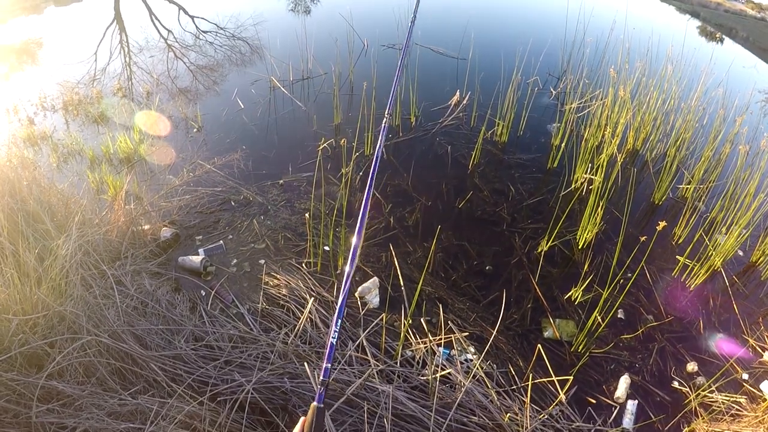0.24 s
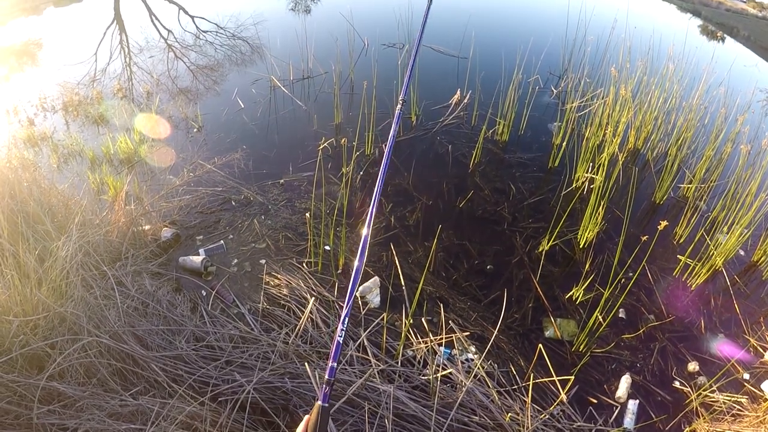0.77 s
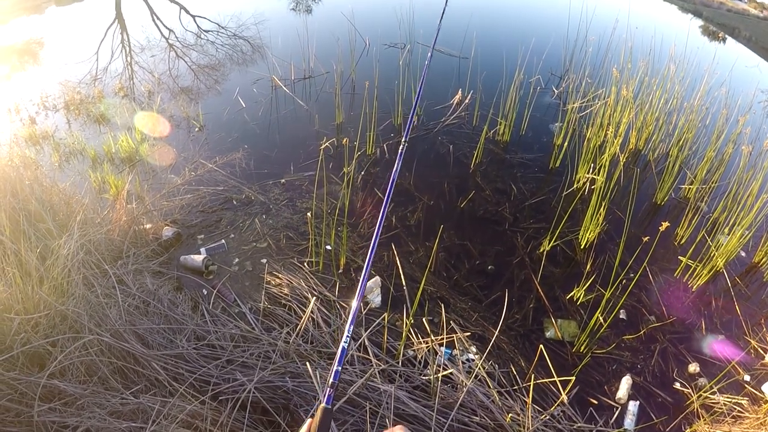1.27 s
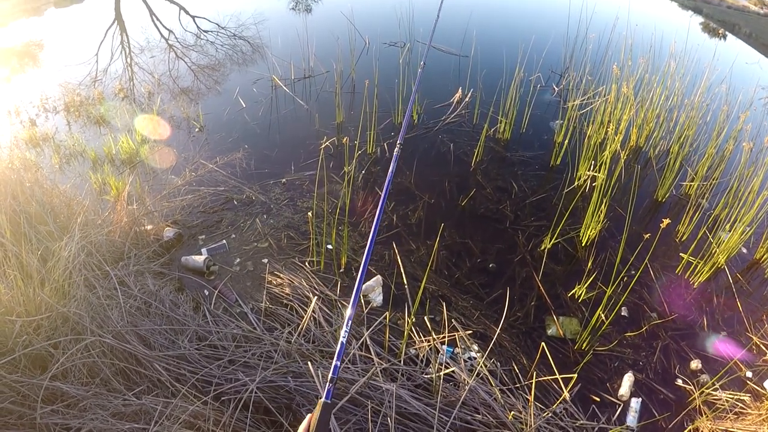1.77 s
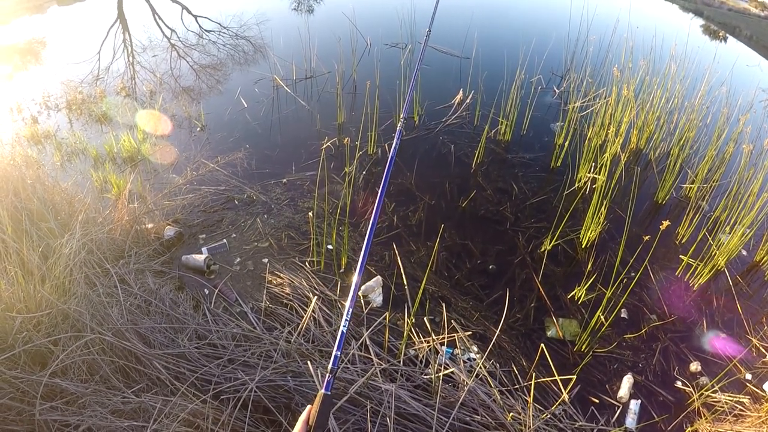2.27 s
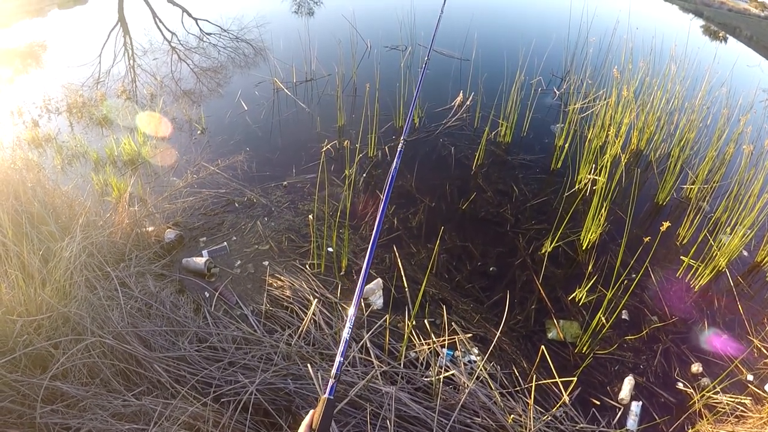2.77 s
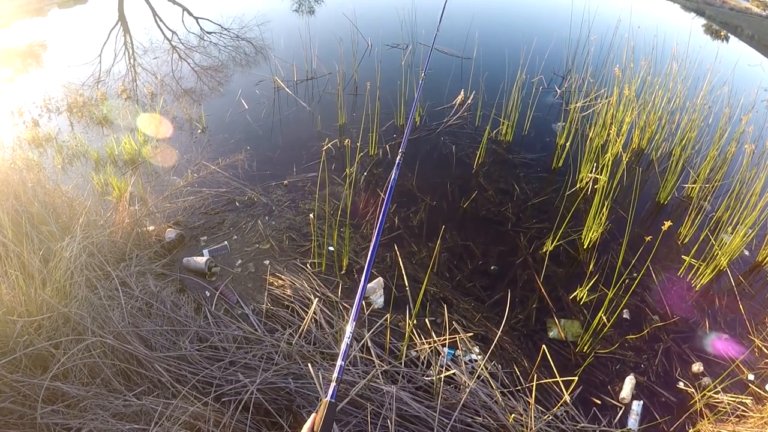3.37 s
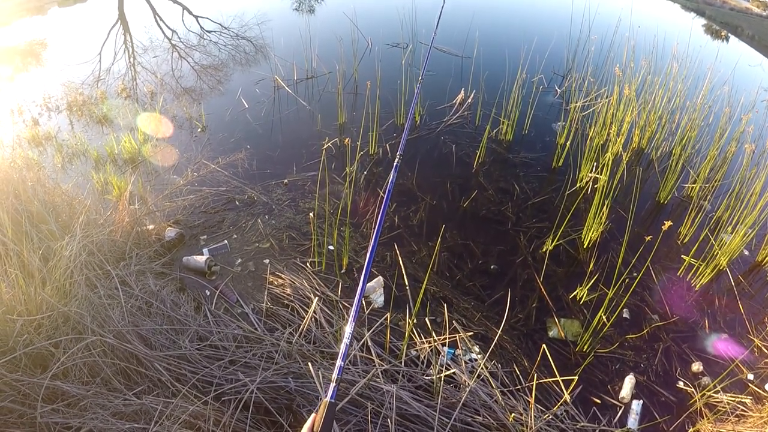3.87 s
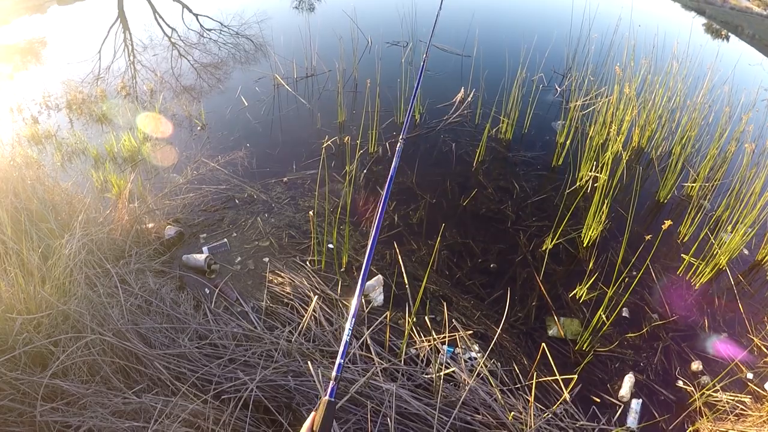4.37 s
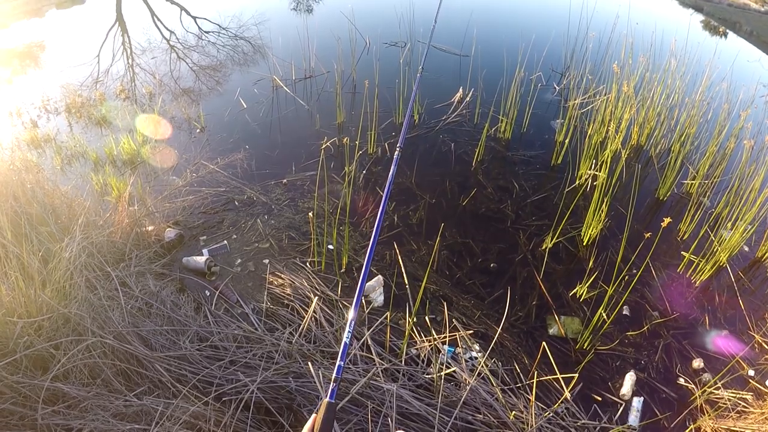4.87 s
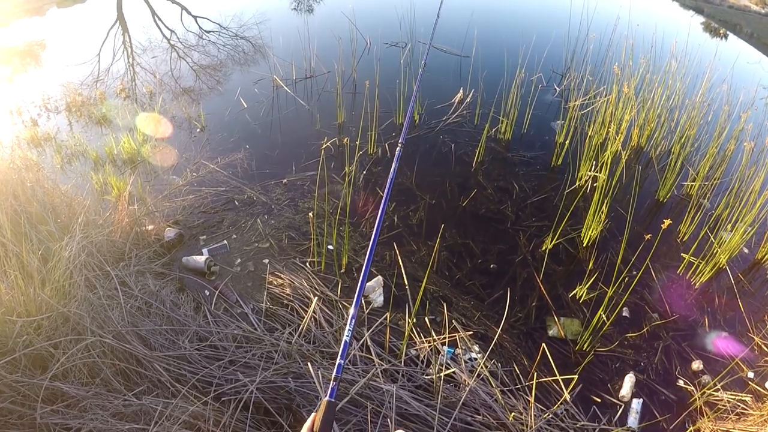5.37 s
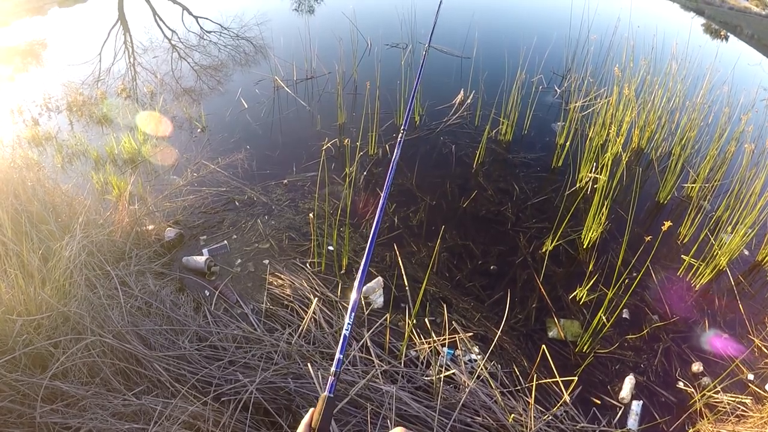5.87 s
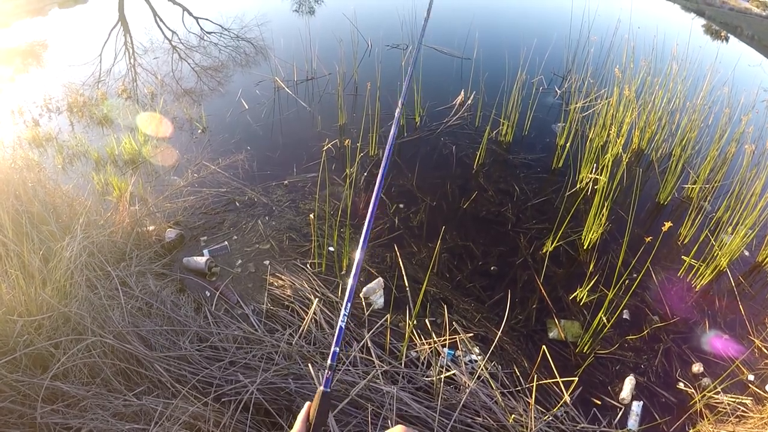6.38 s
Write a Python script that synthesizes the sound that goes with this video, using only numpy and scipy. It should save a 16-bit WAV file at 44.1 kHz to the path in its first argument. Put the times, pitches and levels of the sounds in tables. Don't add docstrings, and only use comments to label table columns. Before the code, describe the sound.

Distant traffic rumbles continuously across a pond, low and blurred, with small irregular surges of exhaust. At 0 s the rumble is fairly full, with car engines droning away, one gone by about 1 s, others by 2 to 3 s, and dry reeds rustling very faintly before settling. From 1 to 3 s the traffic is lower, with brief deep throbs. Around 2.7 s a lorry's low hum emerges, strongest at 3.1 to 3.7 s as the rumble swells too; it eases near 4.2 s, rises in pitch around 4.6 s as it pulls away, and sinks after 5.2 s. A faint car hum passes at 5.3 to 6.3 s while the rumble thins until the end at 6.6 s. Weak tyre roar slowly fades, with soft singing passes. The enclosed camera adds constant quiet hiss, rapid fluttering and a thin buzzing high whine throughout.

```python
import sys
import numpy as np
from scipy import signal
from scipy.io import wavfile
from scipy.ndimage import uniform_filter1d

SR = 44100
rng = np.random.default_rng(int(sys.argv[2]) if len(sys.argv) > 2 else 0)


def inscribe(sig):
    pcm = np.round(np.clip(np.atleast_2d(sig).T, -1, 1) * 32767)
    wavfile.write(sys.argv[1], SR, pcm.astype(np.int16))


def gain_from_db(level_db):
    decades = np.asarray(level_db, float) / 20
    return 10 ** decades


N = 292203
T = np.arange(N) / SR

# pitch_hz, level_db (per Hz)
HISS_COLOUR = [(1500, -31), (2300, -3), (4260, -2.5), (5100, -7.5), (7810, -8), (8300, -11), (9200, -5.5),
               (10300, -7), (11500, -12.5), (13400, -15), (14600, -19), (15500, -22)]
# pitch_hz, level_db (per Hz)
FLUTTER_COLOUR = [(2500, -30), (3500, -11), (5200, -5), (6500, -1), (7800, -20), (9000, -34)]
# pitch_hz, level_db
CLOCK_TONES = [
    (9999, -91),
    (10417, -91),
    (11138, -96),
]
# pitch_hz, level_db (per Hz)
REED_COLOUR = [(2000, -19), (2600, 0), (3500, -15), (4400, -3), (4900, -9), (5600, -3.5), (6800, -8),
               (8200, -13)]
# pitch_hz, level_db (per Hz)
TYRE_COLOUR = [(190, -26.5), (330, -1), (427, -4.5), (806, -9), (1260, -9), (1520, -8), (2050, -15),
               (3200, -23), (4160, -76), (7040, -120)]
# pitch_hz, width_hz
TREAD_BAND = (1546, 280)
# time_s, length_s, level_db
TREAD_PASSES = [
    (.3, 0.58, -59),
    (.9, 0.26, -63),
    (1.6, 0.37, -67),
    (2.299, 0.45, -61),
    (3.3, .6, -64),
    (4.9, 0.76, -71),
    (5.7, 0.57, -63),
    (6.35, 0.47, -61),
]
# start_s, end_s, first_hz, last_hz, level_db
LEAVING_CARS = [
    (0.0, 3.25, 241.4, 232.8, -44.5),
    (0.0, 2.1, 292, 287, -56),
    (0.0, .9, 204.3, 199, -43),
    (5.3, 6.35, 205, 201.5, -49),
]
# time_s, firing_hz, level_db
LORRY_PATH = [
    (2.7, 110.9, -34.5),
    (3.1, 108.8, -31),
    (3.7, 108.2, -30),
    (4.2, 107.5, -34.5),
    (4.55, 112.1, -32.5),
    (4.75, 122.5, -31),
    (5.05, 122.9, -31),
    (5.35, 122.3, -38.5),
    (6.63, 123.3, -39.5),
]
# time_s, length_s, centre_hz, level_db
THROTTLES = [(0.173, .15, 83, -31), (0.193, .2, 199, -35.5), (1.094, 0.48, 73.5, -31.5),
             (1.974, 0.18, 181.6, -36), (2.398, 0.13, 89, -36), (2.622, 0.17, 206.6, -35.5),
             (3.307, 0.18, 141.9, -32), (3.747, 0.43, 84.7, -32), (4.308, 0.27, 218, -41.5),
             (4.8, 0.26, 71, -31), (0.644, 0.14, 121.3, -34.5), (1.336, 0.23, 70, -33),
             (2.068, 0.26, 135.5, -36), (2.69, .3, 68, -37), (4.358, 0.15, 44.7, -24.5),
             (5.416, 0.12, 132.5, -36), (4.755, 0.096, 196, -39), (.7, 0.39, 45.8, -33.5)]
# time_s, level_db (over the usual)
TRAFFIC_NEAR = [(0.0, 3.5), (0.35, 2), (0.8, -0.6), (1.4, -1.95), (2.1, -1.5), (2.6, -0.8), (3.0, -2.1),
                (3.4, 2.5), (3.8, 2), (4.3, 0.4), (4.9, 0.2), (5.3, -2.6), (5.9, -3), (6.63, -4.5)]
# pitch_hz, level_db (per Hz)
DEEP_COLOUR = [(4.7, -33), (8.0, -4.5), (32, -3.5), (90, -9), (120, -14), (200, -120)]
BODY_COLOUR = [(26, -30), (45, -7.5), (81, -4.5), (150, -8.5), (200, -79), (330, -120)]
UPPER_COLOUR = [(100, -16), (140, -0.5), (165, -3.5), (200, -0.5), (235, -9), (255, -12), (290, -16.5),
                (330, -24), (370, -39), (450, -48), (600, -78)]
# level_db (usual), share (of the traffic swing)
EXHAUST_LAYERS = [
    (-28, 0.7),
    (-33.5, 1.97),
    (-36.5, 0.67),
]


def evened(x):
    return x / np.sqrt(np.mean(x ** 2) + 1e-20)


def curve(rows):
    time_s, *columns = np.transpose(rows)
    return [np.interp(T, time_s, column) for column in columns]


def swell(time_s, length_s):
    return np.exp(-.5 * (2 * (T - time_s) / length_s) ** 2)


def noise(colour, patchy_db=0., size=2048):
    hop = size // 4
    hz = np.fft.rfftfreq(size, 1 / SR)
    real, imaginary, patches = rng.standard_normal((N // hop + 5, len(hz), 3)).T
    patches = uniform_filter1d(patches, size=14, axis=0)
    patches = evened(uniform_filter1d(patches, size=8, axis=1))
    point_hz, point_db = np.transpose(colour)
    colour_db = np.interp(np.log(hz + 1), np.log(point_hz + 1), point_db, -120, -120)
    spectra = (real + 1j * imaginary) * gain_from_db(colour_db[:, None] + patchy_db * patches)
    return evened(signal.istft(spectra, nperseg=size, noverlap=size - hop)[1][:N])


def resonate(x, hz, width_hz):
    turn = np.exp(2j * np.pi * hz * T)
    r = np.exp(-np.pi * abs(width_hz) / SR)
    return 2 * (turn * signal.lfilter([1 - r], [1, -r], x / turn)).real


def ring(x, hz, width_hz):
    return evened(resonate(resonate(x, hz, width_hz), hz, width_hz))


def hiss():
    return gain_from_db(-60.56) * noise(HISS_COLOUR, 0.1)


def clocks():
    return sum(np.sqrt(2) * gain_from_db(level_db) * np.sin(2 * np.pi * hz * T) for hz, level_db in CLOCK_TONES)


def flutter(level_db=-74.5, puff_ms=4.0, puffs_per_s=29.41, first_s=.0005):
    from_puff_s = (((T - first_s) * puffs_per_s + .5) % 1 - .5) / puffs_per_s
    puffs = np.exp(-.5 * (1000 * from_puff_s / puff_ms) ** 2)
    return gain_from_db(level_db) * noise(FLUTTER_COLOUR, size=512) * evened(puffs)


def whine(burst_db=-70.0, idle_db=-71.0, hz=8560.0, fields_per_s=59.94, field_end_s=.0060):
    fields = (T - field_end_s) * fields_per_s
    k = np.ceil(fields).astype(int)
    to_end_ms = (k - fields) * 1000 / fields_per_s
    stretch, detune, phase = rng.standard_normal((k.max() + 1, 3)).T
    long_ms, short_ms, spread = 6.4, 2.7, 0.18
    length_ms = np.where(k % 2, long_ms, short_ms) * np.exp(spread * stretch[k])
    gate = uniform_filter1d((to_end_ms < length_ms) * np.exp(-.06 * to_end_ms), size=40)
    burst_hz = hz + 25. * detune[k]
    burst = gate * np.sin(2 * np.pi * (burst_hz * to_end_ms / 1000 + phase[k]))
    idle = ring(rng.standard_normal(N), hz, 220.)
    return gain_from_db(burst_db) * evened(burst) + gain_from_db(idle_db) * idle


def reeds(level_db=-63, hold_s=0.21, fade_db_per_s=-9):
    fading_db = level_db + fade_db_per_s * np.maximum(T - hold_s, 0)
    return gain_from_db(fading_db) * noise(REED_COLOUR, 2.1, size=512)


def tyres():
    near_db = curve(TRAFFIC_NEAR)[0]
    roar_db = -52.5 + 0.051 * near_db - 0.34 * T
    passes = sum((gain_from_db(level_db) * swell(time_s, length_s)) ** 2
                 for time_s, length_s, level_db in TREAD_PASSES)
    song_strength = np.sqrt(gain_from_db(-68.5) ** 2 + passes)
    song = ring(noise([(500, 0), (3000, 0)], 1.1), *TREAD_BAND)
    return gain_from_db(roar_db) * noise(TYRE_COLOUR, 0.31) + song_strength * song


def engine(rows, waver_hz, rough):
    hz, level_db = curve(rows)
    air = rng.standard_normal((2, N))
    waver, fade = (evened(uniform_filter1d(uniform_filter1d(a, size=1800), size=1800)) for a in air)
    from_start_s = T - rows[0][0] + .01
    to_end_s = rows[-1][0] + .01 - T
    heard = np.clip(np.minimum(from_start_s, to_end_s) / .12, 0, 1)
    turns = np.cumsum(hz + waver_hz * waver) / SR + rng.random()
    return np.sqrt(2) * gain_from_db(level_db) * heard * (1 + rough * fade) * np.sin(2 * np.pi * turns)


def cars(fade_db_per_s=-1.77):
    total = 0
    for start_s, end_s, first_hz, last_hz, level_db in LEAVING_CARS:
        last_db = level_db + fade_db_per_s * (end_s - start_s)
        path = [(start_s, first_hz, level_db), (end_s, last_hz, last_db)]
        total = total + engine(path, 0.83, 0.31)
    return total


def lorry():
    return engine(LORRY_PATH, 1.46, 0.26)


def revs():
    total = 0
    for time_s, length_s, hz, level_db in THROTTLES:
        puff = ring(rng.standard_normal(N), hz, 0.18 * hz)
        total = total + gain_from_db(level_db) * swell(time_s, length_s) * puff
    return total


def rumble():
    near_db = curve(TRAFFIC_NEAR)[0]
    total = 0
    for colour, (level_db, share) in zip((DEEP_COLOUR, BODY_COLOUR, UPPER_COLOUR), EXHAUST_LAYERS):
        total = total + gain_from_db(level_db + share * near_db) * noise(colour, 0.46, size=8192)
    return total


def scene():
    return (reeds() + tyres() + cars() + lorry() + revs() + rumble())[None]


def starved(x, often=.95, dip=.95):
    hz, t, z = signal.stft(x, SR, nperseg=2048, noverlap=1024)
    need = rng.random(len(t)) ** 3
    dice = rng.random((len(t), len(hz) // 8 + 1)).T
    dice = np.repeat(dice, 8, axis=0)[:len(hz)]
    chance = often * np.clip((hz[:, None] - 14500 + 2600 * need) / 1500, 0, 1)
    z = z * (1 - dip * (dice < chance))
    return signal.istft(z, SR, nperseg=2048, noverlap=1024)[1][:, :N]


def top_cut(x):
    return signal.sosfilt(signal.butter(12, 15180, fs=SR, output="sos"), x)


def record(dry):
    own = hiss() + flutter() + whine() + clocks()
    start = np.minimum(T / .003, 1)
    mix = starved(start * dry + own)
    return top_cut(mix)


dry = scene()
out = record(dry)
inscribe(out)
```